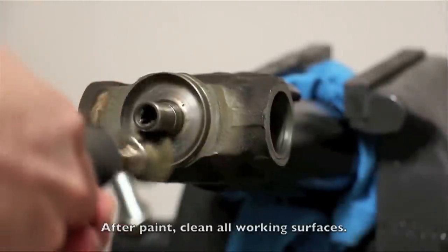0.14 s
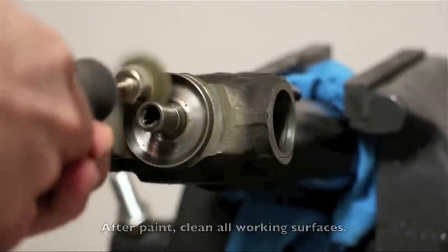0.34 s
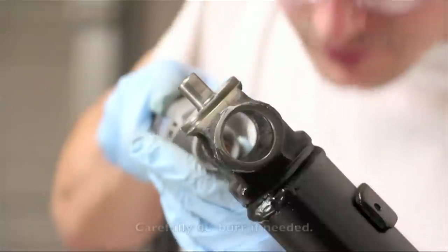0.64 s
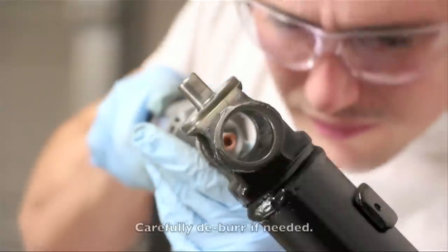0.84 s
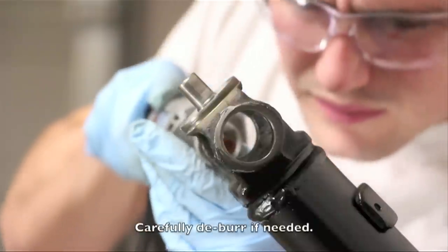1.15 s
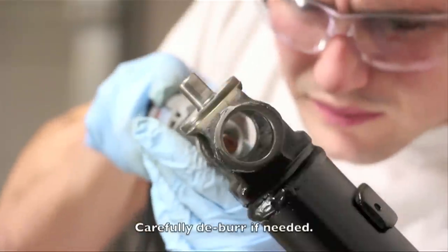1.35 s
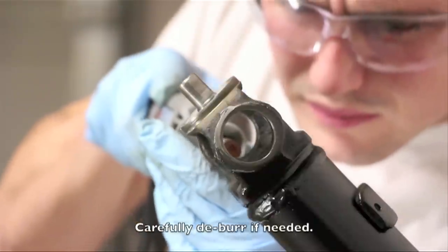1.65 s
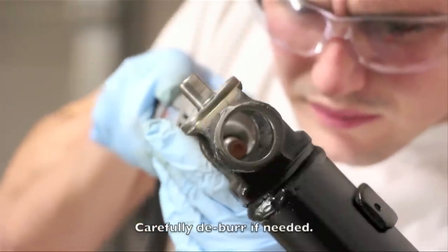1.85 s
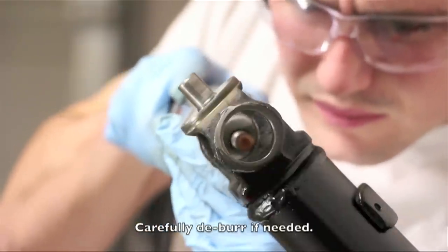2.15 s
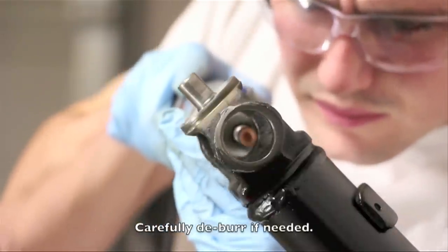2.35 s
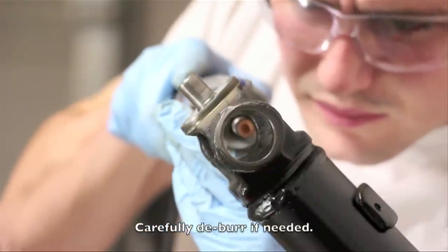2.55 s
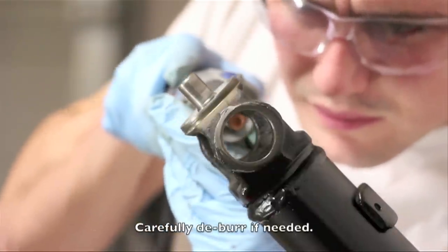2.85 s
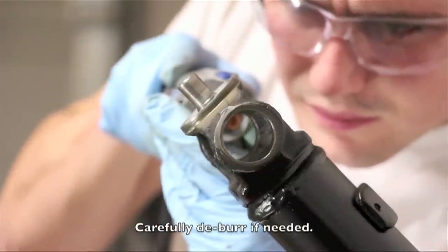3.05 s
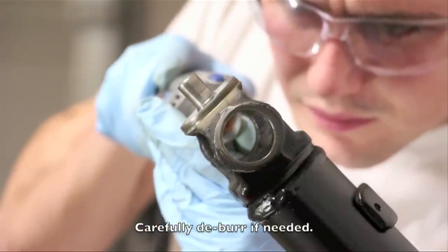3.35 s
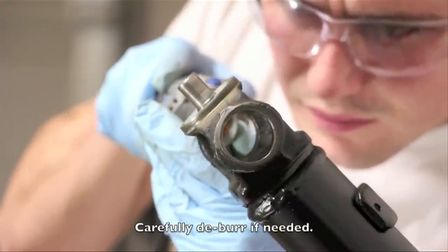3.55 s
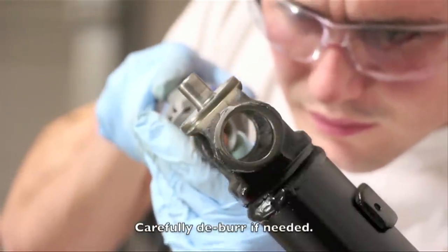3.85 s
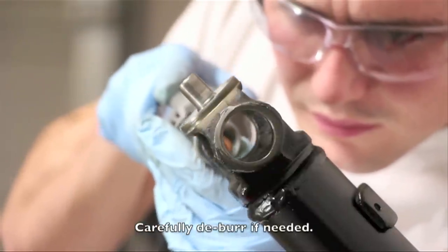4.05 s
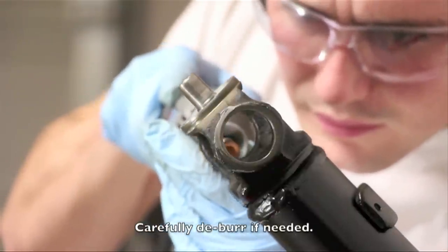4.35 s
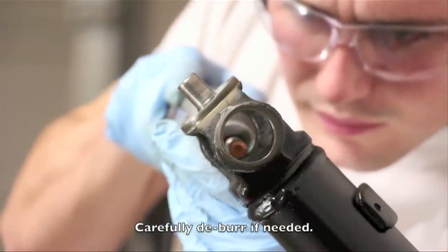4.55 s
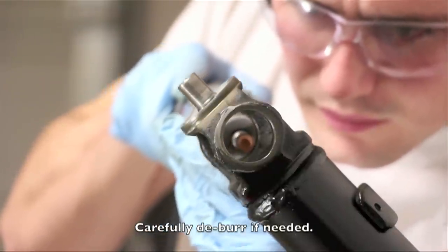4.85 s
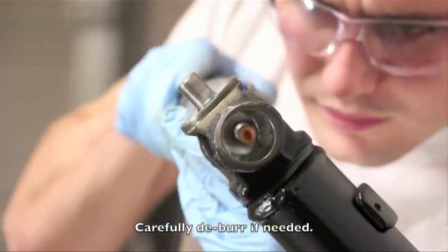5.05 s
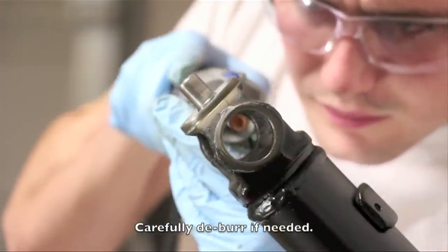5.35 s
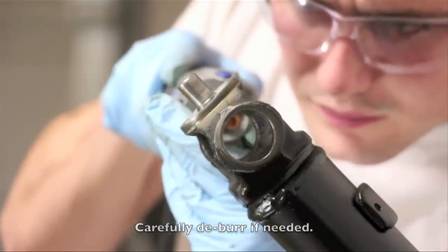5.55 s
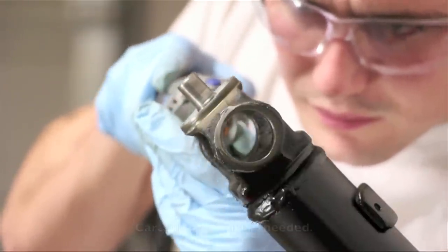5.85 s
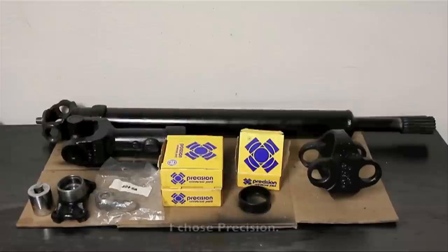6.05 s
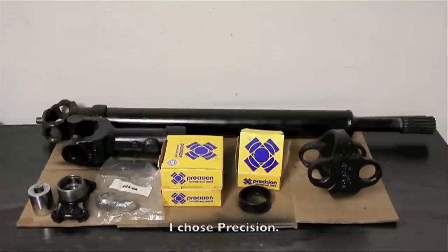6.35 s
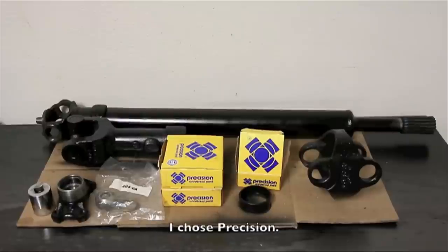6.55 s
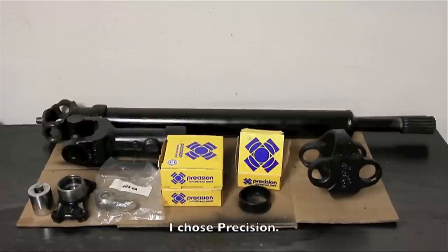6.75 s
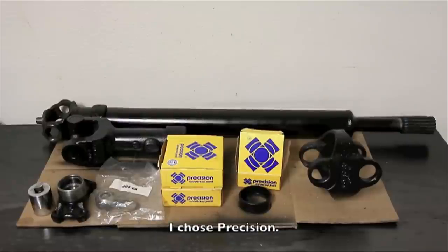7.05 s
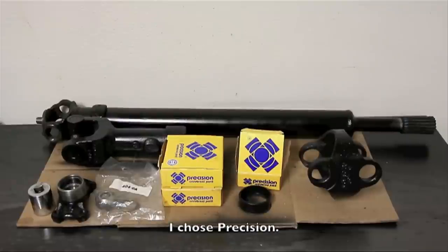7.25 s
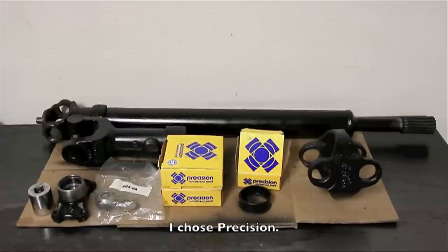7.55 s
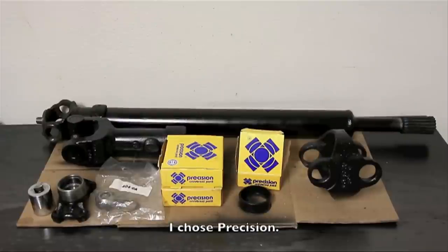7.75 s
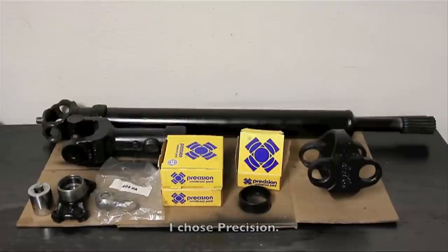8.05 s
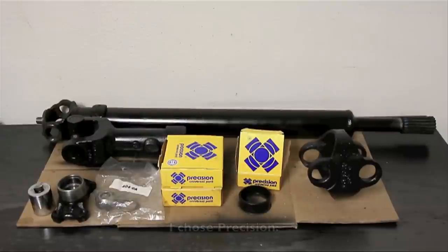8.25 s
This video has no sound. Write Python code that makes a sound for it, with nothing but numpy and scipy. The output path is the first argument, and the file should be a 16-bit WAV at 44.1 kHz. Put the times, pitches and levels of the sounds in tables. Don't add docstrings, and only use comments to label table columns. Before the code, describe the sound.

A wire wheel scrubs ringing steel briefly, then a small rotary tool whines and grinds a metal bore with rough chatter, before a quiet room hum.

```python
import sys
import numpy as np
from scipy import signal
from scipy.io import wavfile
from scipy.ndimage import uniform_filter1d, map_coordinates

SR = 44100
rng = np.random.default_rng(int(sys.argv[2]) if len(sys.argv) > 2 else 0)


def pcm_store(signal):
    levels = np.round(np.clip(np.atleast_2d(signal), -1, 1) * 32767)
    wavfile.write(sys.argv[1], SR, levels.astype(np.int16).T)


def how_loud(loudness_db):
    steps = np.asarray(loudness_db, float) / 20
    return 10 ** steps


N = 370440
T = np.arange(N) / SR

# start t/s, end t/s, fade in/s, fade out/s
SHOTS = [
    (0, .624, 0, .11),
    (0.634, 6.0, 0.036, .14),
    (6.005, 9, 0.083, 0),
]

# t/s, level/dB
BRUSH_LEVEL = [(0.0, -26.5), (0.318, -27.5), (0.408, -28.5), (0.54, -28.5)]
# f/Hz, level/dB per Hz
WIRE_COLOUR = [(60, -36), (110, -15), (200, -61), (300, -11), (900, -10), (1400, -10.5), (1800, -10.5),
               (2500, -5.5), (3500, -10), (5500, -13.5), (8000, -17.5), (12000, -24), (15700, -34)]
# width/Hz, level/dB
BRUSHED_HZ = [102, 242, 409, 1335, 2320, 2430, 2557, 2665, 3190, 3254, 4345, 4560, 7212, 7644, 15100]
BRUSHED_SHAPE = [(14, -5), (10, 0), (19.9, -7), (60, 9.5), (30, 12), (40, 10), (40, 11), (30, -12),
                 (20, -10), (20, 15), (20, 14), (20.2, 15), (25, 12), (25, 10), (37, 5)]
# start t/s, end t/s, level/dB
BRUSH_SINGS = [(-.1, 0.23, -33), (.34, 0.56, -31.5)]
# start t/s, end t/s, f/Hz, level/dB
WHEEL_TONES = [(-0.04, .32, 93, -52), (-0.7, 0.85, 242, -52.5), (0.046, .16, 310, -43),
               (0.027, .18, 405, -42), (0.1, 0.49, 890, -43), (-0.0051, .23, 3252, -37),
               (0.087, 0.73, 2300, -45), (-0.12, 0.14, 4345, -33.5), (0.32, .43, 4200, -37)]
WHEEL_TURNS_PER_S = 103.5

# f/Hz, level/dB
RUMBLE_COLOUR = [(15, -52), (25, -37), (48, -6), (86, -15.5), (108, -19), (166, -16.5), (190, -8),
                 (250, -6), (420, -120)]
RUMBLE_DB = -56.5
# level running free/dB, change under load/dB per s
BODY_RIPPLE = (-62, -3.5)

# t/s, shaft turns per s
SPEED = [(0.63, 229.8), (0.72, 234.4), (0.85, 237.7), (1.02, 240.9), (1.22, 242.4), (1.72, 245),
         (1.89, 243.3), (2.21, 236.1), (2.4, 233.1), (2.72, 229.6), (2.93, 230.2), (3.23, 227.0),
         (3.62, 226.9), (4.25, 225.0), (4.45, 223.5), (5.08, 222.2), (5.44, 226.9), (6.0, 225.6)]
# shaft order, level/dB
MOTOR_LINES = [(5, -56), (12, -45), (16, -47), (21, -50), (24, -45), (32, -50), (40, -50), (48, -52)]
MAINS_HZ, SIDEBAND_DB, BUZZ_DB = 121.5, -10, -48.5
# start t/s, end t/s, shaft order,
# level/dB
SHAKES = [(.8, 1.45, 1, -47), (1.72, 1.97, 1, -47), (2.55, 3.15, 1, -43.5), (3.4, 4.6, 1, -37.5),
          (4.9, 5.55, 1, -37.5), (1.72, 2.02, 2, -40), (2.46, 3.14, 2, -32.5), (3.5, 4.3, 2, -40),
          (4.0, 4.9, 2, -35), (4.5, 5.46, 2, -31.5), (.8, 1.35, 3, -42.5), (2.12, 2.68, 3, -37.5),
          (2.76, 3.52, 3, -35.5), (5.04, 5.35, 3, -44), (5.7, 6.1, 1, -49)]
SHAKE_REST_DB = [-52, -50, -49]
FAN_DB = -40.5
# sunk level/dB, level in brief bursts/dB
FAN_LOADED_DB = (-60, -10)

CONTACT_S = 1.735
# t/s, pressure level/dB, edge brightness as the stone's corner bites/dB
GRIND_HAND = [(0.7, -31, -2), (1.05, -29, -3), (1.27, -27, -3.5), (1.72, -26, -4), (1.75, -19.5, -2),
              (2.06, -23.5, 1.5), (2.38, -25.5, 1.5), (2.53, -23.5, -1), (2.62, -23, -3.5),
              (3.14, -21.5, 0.5), (3.6, -23, -1), (3.99, -25, -1.5), (4.62, -26, 3.5), (4.7, -27.5, 2),
              (5.07, -26.5, -0.5), (5.42, -21.5, -0.5), (5.72, -21, -0.5), (5.9, -23.5, -0.5)]
EDGE_HZ = [1800, 4500, 7100, 10500]
EDGE_SHARE = [0.01, 1.68, 0.92, 0.69]
# f/Hz, level/dB per Hz
STONE_COLOUR = [(120, -28.5), (220, -30.5), (320, -15), (500, -8.5), (800, -10.5), (1300, -4), (2000, -0.5),
                (3400, -3.5), (4500, -2.5), (6200, -7.5), (9460, -14), (12300, -20.5), (12900, -25),
                (13200, -90), (15700, -95.5)]
# start t/s, end t/s, f/Hz, width/Hz, level/dB
BORE_CHATTER = [(1.76, 2.55, 1760, 730, 6.5), (1.92, 2.33, 4170, 1600, 5.5), (1.79, 2.25, 9340, 580, 13.5),
                (3.8, 2.5, 4600, 400, 2), (2.9, 3.56, 2220, 820, 9), (2.8, 3.61, 3170, 160, 10),
                (4, 4.94, 9840, 1700, 9), (1.7, 8.2, 4500, 630, 2.5), (5.29, 5.93, 2300, 790, 9.5),
                (5.3, 5.852, 3290, 190, 8), (5.6, 5.815, 1770, 220, 14), (4.7, 6.35, 440, 37, 16.5),
                (4.62, 5.02, 6400, 2800, 2), (3.08, 3.55, 7530, 3200, 7.5), (8.1, 8.3, 10000, 1300, 9),
                (3.76, 4.3, 6300, 2100, 4.5)]
# start t/s, end t/s, strength 0-1
BOUNCES = [
    (1.7, 2.376, 0.7),
    (2.846, 3.733, 1),
    (4.236, 4.814, .6),
    (5.236, 5.957, 1),
]
KNOCK_SHARE = (.58, .4)
HALF_SHARE = (0.36, 0.58)

# start t/s, end t/s, level/dB
ORDER_SWELLS = [(.82, 1.02, -36.5), (0.693, 0.808, -31.5), (0.868, 1.784, -37.5), (1.117, 1.383, -46),
                (1.2, 1.427, -33.5), (1.53, 1.78, -38), (1.352, 1.606, -34), (1.706, 1.917, -31),
                (1.784, 1.98, -29), (1.727, 1.953, -34), (1.713, 1.88, -24), (1.79, 1.954, -38),
                (2.028, 2.32, -28.5), (2.04, 2.205, -30), (2.25, 2.6, -40), (2.545, 2.949, -27.5),
                (2.555, 2.795, -23.5), (2.556, 2.69, -33), (2.57, 2.97, -38), (2.737, 2.92, -33),
                (2.83, 3.026, -29), (2.864, 3.145, -29.5), (2.88, 3.133, -23.5), (2.913, 3.302, -32),
                (2.937, 3.155, -33), (3.12, 3.312, -22.5), (3.214, 3.675, -33.5), (3.304, 3.648, -36),
                (3.6, 3.983, -41), (3.68, 4.25, -29), (3.708, 4.243, -45), (4.098, 4.38, -29),
                (4.214, 4.44, -27), (4.264, 4.596, -30), (4.316, 4.674, -29), (4.37, 5.03, -28.5),
                (4.39, 4.73, -23.5), (4.424, 4.71, -33), (4.584, 5.07, -25.5), (4.697, 5.032, -32.5),
                (5.025, 5.28, -35.5), (5.055, 5.92, -37), (5.22, 5.608, -28.5), (5.273, 5.43, -30.5),
                (5.26, 5.568, -31.5), (5.333, 5.52, -29), (5.33, 5.802, -38), (5.52, 5.816, -33.5),
                (5.565, 5.803, -25.5), (5.6, 5.853, -26.5)]
SWELL_ORDERS = [
    [16],
    [24],
    [24],
    [24],
    [12],
    [12],
    [16],
    [7],
    [9],
    [7.5, 8, 8.5, 9.5],
    [22.5],
    [16.5, 17],
    [8],
    [17.5, 18, 18.5, 19],
    [7, 16, 18],
    [7],
    [8],
    [5],
    [11, 16],
    [12],
    [19, 20],
    [7, 24],
    [8],
    [10],
    [9, 15, 31.5],
    [30],
    [10],
    [18, 19, 19.5],
    [19, 20],
    [32],
    [10, 11, 21, 31],
    [19],
    [10, 11],
    [24.5, 25],
    [12],
    [8, 14],
    [9],
    [15, 18],
    [25],
    [19, 22, 26],
    [8],
    [7],
    [10, 11],
    [17, 18, 20],
    [19],
    [14],
    [14.5, 15, 32],
    [11, 14],
    [8],
    [13],
]

PART_HZ = [5545, 6822, 7234, 15130, 12956, 12300, 14200, 6990, 7730, 14720]
PART_WIDTH_HZ = [60, 18, 37, 90, 45, 40, 30, 34, 8.8, 60]
# start t/s, end t/s, level/dB
PART_SINGS = [
    [(1.7, 2.25, -39), (2.36, 2.7, -48), (2.76, 2.98, -31.5), (2.85, 3.14, -37), (3.9, 4.6, -38.5),
     (4.55, 4.9, -43), (4.8, 5.06, -40.5), (5.12, 5.7, -41.5)],
    [(2.72, 3.45, -41), (3.63, 3.84, -35.5), (3.9, 4.22, -36.5), (5.3, 6.1, -37.5)],
    [(2.76, 3.22, -41), (3.63, 4.24, -42.5), (5.28, 5.86, -42)],
    [(1.68, 2.05, -46), (1.9, 2.75, -61.5), (2.68, 3.5, -45.5), (3.52, 4.1, -53), (3.95, 4.6, -47),
     (4.5, 6.1, -53.5), (5.3, 5.75, -52)],
]
PART_REST_DB = [-43.5, -54, -65.5, -58]
# which of the first four it follows, level/dB
PART_FOLLOW = [(0, -9.5), (1, -12), (1, -30), (2, 1), (0, -7.5), (3, -15)]

# f/Hz, level/dB
SHOP_COLOUR = [(12, -64), (20, -32), (52, -9), (90, -15), (126, -9), (246, -11.5), (395, -15), (454, -12),
               (494, -16.5), (938, -16), (1510, -23.5), (2050, -24), (6000, -29.5), (15700, -39.5)]
SHOP_DB = -54
# f/Hz, width/Hz, level/dB
SHOP_HUM = [(60, 21, 0), (120.8, 5.2, 12), (200, 20, 1.5), (225, 12, 2.5)]
# t/s, peak level/dB, hiss share 0-1
TICKS = [(6.0173, -32.5, 0.4), (6.2394, -39.5, 0.9), (6.9244, -44, 0.7), (6.9444, -52, 0.7),
         (6.97, -39, 0.7), (6.9994, -49, 0.8), (7.0094, -42, 0.9), (7.02, -39, 0.75)]
# start t/s, end t/s, rise/s, fall/s
RUSTLE = (6.89, 7.04, .07, .03)
RUSTLE_DB = -58.5

# f/Hz, side minus mid level/dB
WIDTH_BRUSH = [(60, -1), (240, -15), (950, -13.5), (3770, -5.5), (15000, 0)]
WIDTH_GRIND = [(60, -18), (150, -3), (380, -7), (950, -13), (2380, -5.5), (5980, -2.5), (15000, 4.5)]
WIDTH_SHOP = [(60, -13), (180, -4.5), (550, -1), (1650, 4), (4970, 2.5), (15000, 0)]
# f/Hz, left minus right level/dB
LEAN = [(60, 1), (380, 1), (2380, 0.5), (15000, -2)]


def evened(x):
    return x / np.sqrt(np.mean(x ** 2) + 1e-20)


def read(points, hz):
    f, value = np.transpose(points)
    return np.interp(np.log(hz + 1), np.log(f + 1), value)


def columns(rows, t):
    s, *values = np.transpose(rows)
    return [np.interp(t, s, v) for v in values]


def wander(count, per_s):
    knots = rng.standard_normal((count, 400))
    which = np.arange(count)[:, None] + 0 * T
    place = T[None] * per_s + np.zeros((count, 1))
    return map_coordinates(knots, [which, place], order=1) * 1.4


def fade(start, end, rise, fall):
    fade_in = (T - start + 1e-6) / (rise + 1e-9)
    fade_out = (end - T) / (fall + 1e-9)
    return np.clip(np.minimum(fade_in, fade_out), 0, 1)


def held(start, end, t, power=0.8):
    return np.sin(np.pi * np.clip((t - start) / (end - start), 0, 1)) ** power


def flares(rows, rest_db, first, power):
    gains = [how_loud(db) + 0 * T for db in rest_db]
    for start, end, which, db in rows:
        k = round(which) - first
        gains[k] = np.maximum(gains[k], how_loud(db) * held(start, end, T, power))
    return gains


def resonance(hz, centre_hz, width_hz):
    return 1 / (1 + (2 * (hz - centre_hz) / width_hz) ** 2)


def humps(modes, hz):
    return np.sqrt(1 + sum(how_loud(2 * db) * resonance(hz, f, w) for f, w, db in modes))


def heard(drive, colour, side, size=2048, patchy_db=2.0, walls_s=0.31):
    t = np.arange(SR // 2) / SR
    walls = rng.standard_normal(len(t)) * how_loud(-60 * t / walls_s) * (t > .003)
    echo = signal.oaconvolve(drive, walls / np.linalg.norm(walls))[:N]
    hz, t, z = signal.stft(np.array([drive, echo]), SR, nperseg=size, noverlap=size * 3 // 4)
    patches = uniform_filter1d(rng.standard_normal(z[0].shape), 20, 0)
    patches = evened(uniform_filter1d(patches, 8, 1))
    wide = z[1] * how_loud(read(side, hz))[:, None]
    lean = how_loud(read(LEAN, hz) / 2)[:, None]
    z = np.array([(z[0] + wide) * lean, (z[0] - wide) / lean])
    z = z * colour(hz[:, None], t) * how_loud(patchy_db * patches)
    return signal.istft(z, SR, nperseg=size, noverlap=size * 3 // 4)[1][:, :N]


def banded(x, lo_hz, hi_hz):
    band = signal.butter(4, [lo_hz, hi_hz], "band", fs=SR, output="sos")
    part_of_mid = signal.sosfilt(band, x.mean(0))
    return x / np.sqrt(uniform_filter1d(part_of_mid ** 2, 9000) + 1e-20)


def singing(hz, width_hz, steady=0.056, apart=0.83):
    r = np.exp(-np.pi * width_hz / SR)
    scrape = rng.standard_normal((2, N)) + 1j * rng.standard_normal((2, N))
    mid, side = signal.lfilter([1], [1, -2 * r, r * r], scrape)
    mid, side = mid / abs(mid) ** steady, side / abs(side) ** steady
    mid, side = mid / abs(mid).mean(), apart * side / abs(side).mean()
    return np.sqrt(2) * (np.array([mid + side, mid - side]) * np.exp(2j * np.pi * hz * T)).real


def brush():
    strikes = rng.standard_normal(N) * how_loud(0.5 * wander(count=1, per_s=28)[0])
    strikes *= 1 + 0.23 * np.cos(2 * np.pi * WHEEL_TURNS_PER_S * T)
    modes = [(f, *shape) for f, shape in zip(BRUSHED_HZ, BRUSHED_SHAPE)]

    def colour(hz, t):
        return how_loud(read(WIRE_COLOUR, hz)) * humps(modes, hz) + 0 * t
    level_db = columns(BRUSH_LEVEL, T)[0]
    scrub = how_loud(level_db) * banded(heard(strikes, colour, WIDTH_BRUSH), 1570, 4400)
    size = how_loud(-43.0) + sum(how_loud(db) * held(a, b, T, 0.68) for a, b, db in BRUSH_SINGS)
    tones = size * singing(2077, 5, steady=.85, apart=.3)
    for start, end, f, db in WHEEL_TONES:
        tones += how_loud(db) * held(start, end, T) * singing(f, 5.1, steady=1.0, apart=0.17)
    return scrub + tones


def low_rumble():
    def colour(hz, t):
        return how_loud(read(RUMBLE_COLOUR, hz)) + 0 * t
    rumble = evened(heard(rng.standard_normal(N), colour, WIDTH_GRIND, size=4096))
    free_db, load_db_per_s = BODY_RIPPLE
    ripple_db = free_db + load_db_per_s * np.maximum(T - CONTACT_S, 0)
    return how_loud(RUMBLE_DB) * rumble + how_loud(ripple_db) * singing(MAINS_HZ, 4.2, apart=.2)


def motor(turns):
    mains = MAINS_HZ * T
    flutter = wander(count=4, per_s=34)
    vise = flares(SHAKES, SHAKE_REST_DB, first=1, power=1.2)
    out = sum(size * np.cos(2 * np.pi * (k + 1) * turns) for k, size in enumerate(vise))
    free_db = np.interp(T, [.7, 1.2, 2.0, 2.5], [-12.0, 5, 5, -18.0])
    for j, (order, db) in enumerate(MOTOR_LINES):
        shake, k = flutter[j % 4], round(order)
        line = np.cos(2 * np.pi * k * turns + 4 * k * k + .3 * shake)
        sideband = how_loud(SIDEBAND_DB) * (k > 15) * np.cos(2 * np.pi * (k * turns - mains))
        out += how_loud(db + free_db + 2.5 * shake) * (line + sideband)
    out += how_loud(BUZZ_DB + 0.5 * free_db) * np.cos(2 * np.pi * 3 * mains)
    return np.sqrt(2) * out * how_loud(0) * how_loud([[.3], [-.3]])


def fan():
    treble = signal.butter(4, 11500, "high", fs=SR, output="sos")
    hiss = evened(signal.sosfilt(treble, rng.standard_normal((2, N))))
    speed_db = np.interp(T, [.7, 1.1], [-6, 0])
    loaded_db = np.interp(wander(count=1, per_s=18)[0], [1.2, 1.5], FAN_LOADED_DB)
    flutter_db = 1.2 * wander(count=2, per_s=10.7)
    return how_loud(FAN_DB + speed_db + loaded_db * (T > CONTACT_S) + flutter_db) * hiss


def grind(turns):
    rough = np.clip(sum(size * held(a, b, T, 0.13) for a, b, size in BOUNCES), 0, 1)
    bounce = np.interp(rough, [0, 1], HALF_SHARE)
    on = slice(int(.6 * SR), int(6.1 * SR))
    swell, drift = wander(count=12, per_s=13), wander(count=12, per_s=8)
    knocks = np.zeros(N)
    for k in [3, 5, *range(7, 73), *range(74, 106, 2)]:
        size = how_loud(2.4 * swell[k * 5 % 12, on]) * (bounce[on] if k % 2 else 1)
        waver = (.6 + k / 120) * drift[k * 7 % 12, on]
        knocks[on] += size * np.cos(np.pi * k * turns[on] + k * k + waver)
    pulse = 1 + 0.25 * np.cos(2 * np.pi * turns) + .22 * rough * np.cos(np.pi * turns)
    pulse += 0.04 * np.cos(2 * np.pi * MAINS_HZ * T)
    grit = rng.standard_normal(N) * pulse
    share = np.where(T > CONTACT_S, np.interp(rough, [0, 1], KNOCK_SHARE), .2)
    drive = np.sqrt(share) * knocks / np.sqrt(29 * (1 + bounce ** 2)) + np.sqrt(1 - share) * grit

    def colour(hz, t):
        edge_db = columns(GRIND_HAND, t)[1]
        bore_db = sum(db * held(a, b, t) * resonance(hz, f, w) for a, b, f, w, db in BORE_CHATTER)
        follow = np.interp(np.log(hz + 1), np.log(EDGE_HZ), EDGE_SHARE)
        return how_loud(read(STONE_COLOUR, hz) + bore_db + edge_db * follow)
    level_db = columns(GRIND_HAND, T)[0]
    level_db += 0.62 * wander(count=1, per_s=22)[0] + 0.71 * wander(count=1, per_s=40)[0]
    return how_loud(level_db - 1.5) * banded(heard(drive, colour, WIDTH_GRIND, patchy_db=1.14), 780, 2930)


def swells(turns):
    out = np.zeros((2, N))
    flutter = wander(count=6, per_s=12) * .6 + wander(count=6, per_s=45)
    rows = [(*place, k) for place, orders in zip(ORDER_SWELLS, SWELL_ORDERS) for k in orders]
    lags = rng.uniform(-1.63, 1, len(rows))
    for j, ((start, end, db, k), lag) in enumerate(zip(rows, lags)):
        on = slice(int(start * SR), int(end * SR))
        size = how_loud(db - 3 + 3.1 * flutter[j % 6, on]) * signal.windows.tukey(on.stop - on.start, .4)
        angle = 2 * np.pi * k * turns[on] + 4 * k * k + .3 * flutter[(j + 3) % 6, on]
        out[:, on] += np.sqrt(2) * size * np.cos(angle + np.array([[.6], [-.6]]) * lag)
    return out


def part():
    rows = [(a, b, k, db) for k, arches in enumerate(PART_SINGS) for a, b, db in arches]
    levels_db = [20 * np.log10(size) for size in flares(rows, PART_REST_DB, first=0, power=.7)]
    for k, db in PART_FOLLOW:
        levels_db.append(uniform_filter1d(levels_db[round(k)], 20000) * 0.43 - 28.0 + db)
    touch = wander(count=3, per_s=6)
    for k, depth_db in enumerate([5, 3, 6]):
        levels_db[4 + k] = levels_db[4 + k] + depth_db * touch[k]
    modes = np.zeros((2, N))
    for f, width, db in zip(PART_HZ, PART_WIDTH_HZ, levels_db):
        steady = .6 if f > 15000 or f < 6000 else .11
        modes += how_loud(db + 6.5) * singing(f, width, steady=steady)
    return modes * np.clip((T - CONTACT_S) / .015, 0, 1)


def shop():
    def colour(hz, t):
        return how_loud(read(SHOP_COLOUR, hz)) * humps(SHOP_HUM, hz) + 0 * t
    drive = rng.standard_normal(N)
    air = heard(drive, colour, WIDTH_SHOP, size=4096, patchy_db=0.9, walls_s=2.5)
    return how_loud(SHOP_DB) * air / air[:, -SR:].mean(0).std()


def ticks():
    out, t = np.zeros((2, N)), np.arange(900) / SR
    shape = np.exp(-t / .0025) * np.minimum(t / .001, 1)
    for s, db, hiss in TICKS:
        fuzz = signal.lfilter([1, -1], [1, -1.2, .45], rng.standard_normal((2, 900))) / 3
        click = how_loud(db) * ((1 - hiss) * np.sin(2 * np.pi * 1550 * t) + hiss * fuzz)
        out[:, round(s * SR):][:, :900] += click * shape
    return out


def rustle():
    hiss = signal.lfilter([1, -1], [1, -1.35, .5], rng.standard_normal((2, N)))
    flutter_db = 3.0 * wander(count=1, per_s=90)
    return how_loud(RUSTLE_DB + flutter_db) * evened(hiss) * np.sqrt(fade(*RUSTLE))


def scene():
    turns = np.cumsum(columns(SPEED, T)[0]) / SR
    low = low_rumble()
    brushing = brush() + how_loud(-3.5) * low
    grinding = motor(turns) + fan() + grind(turns) + swells(turns) + part() + low
    quiet = shop() + rustle()
    shots = [brushing, grinding, quiet]
    return sum(fade(*times) * shot for times, shot in zip(SHOTS, shots)) + ticks()


def band_limit(x):
    return signal.sosfilt(signal.butter(12, 15720, fs=SR, output="sos"), x)


def record(dry):
    bass_cut = signal.butter(3, 46, "high", fs=SR, output="sos")
    thin = signal.sosfilt(bass_cut, dry)
    return band_limit(thin)


dry = scene()
out = record(dry)
pcm_store(out)
```